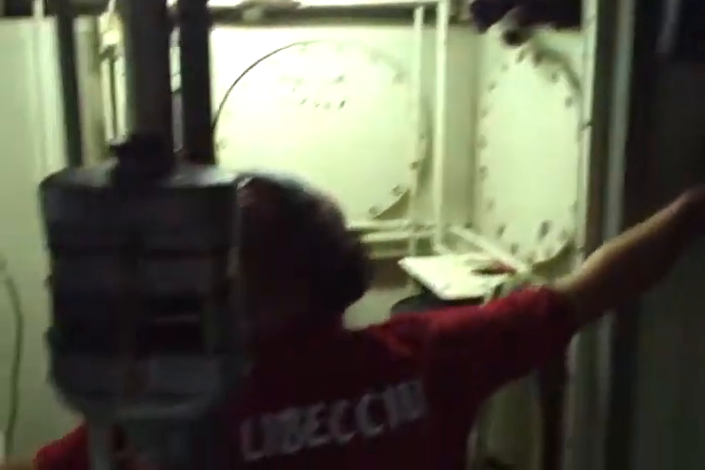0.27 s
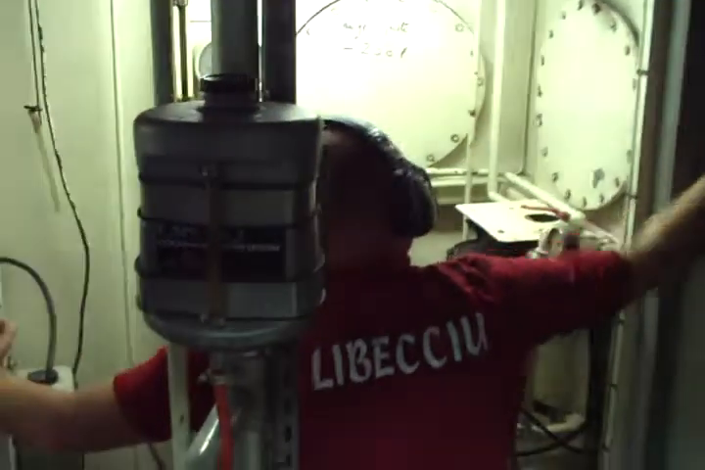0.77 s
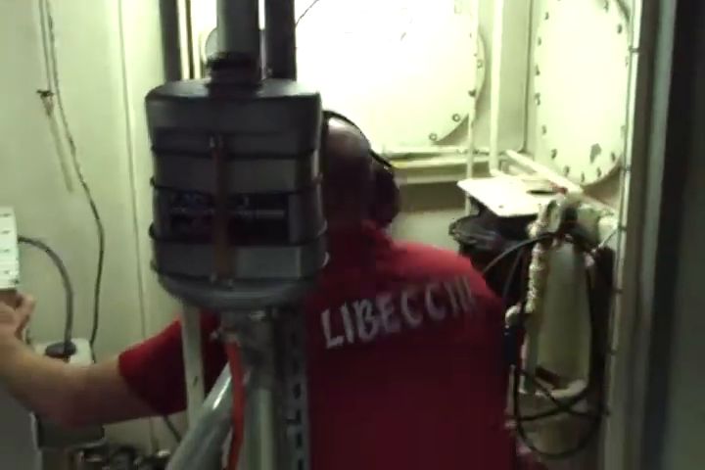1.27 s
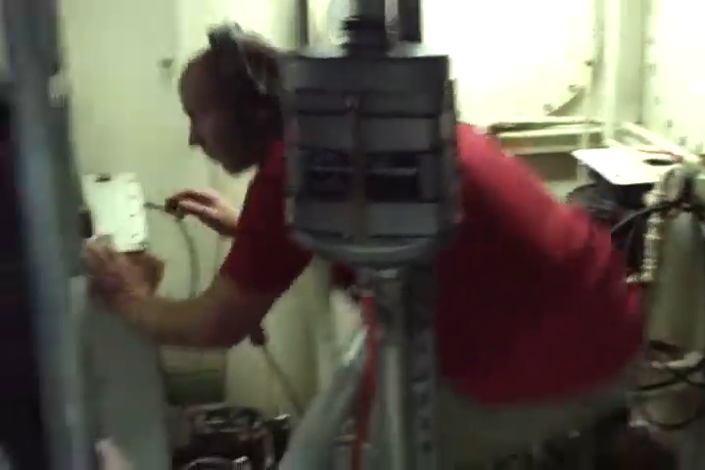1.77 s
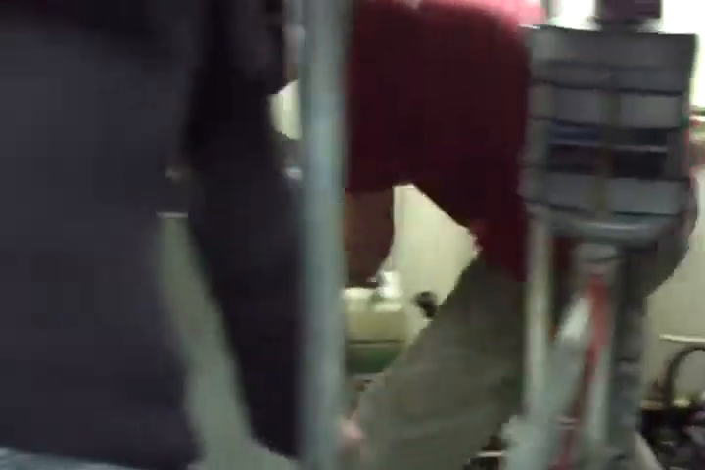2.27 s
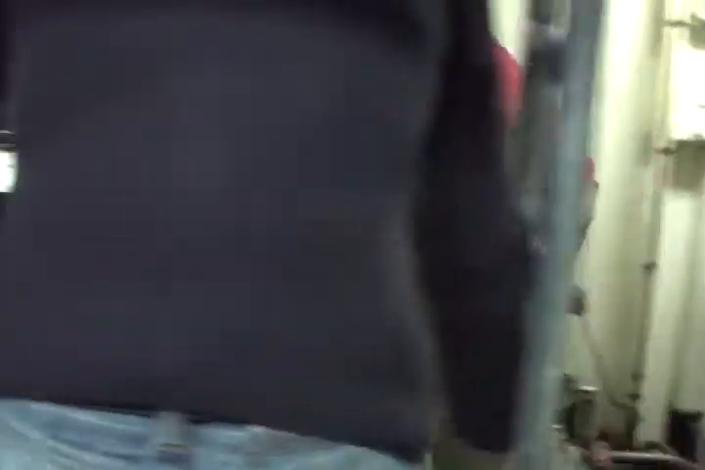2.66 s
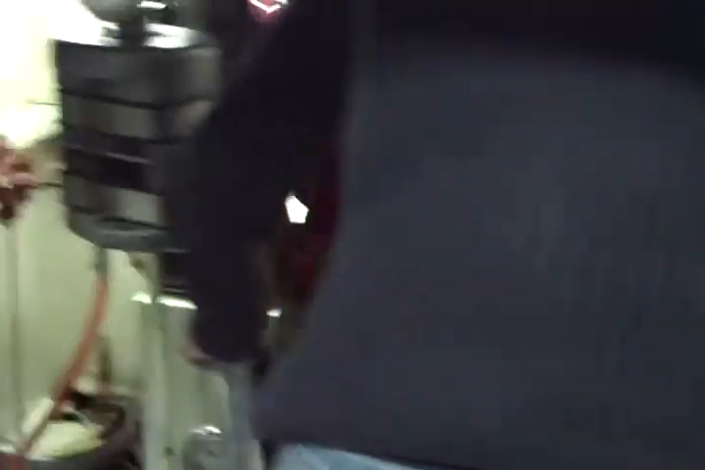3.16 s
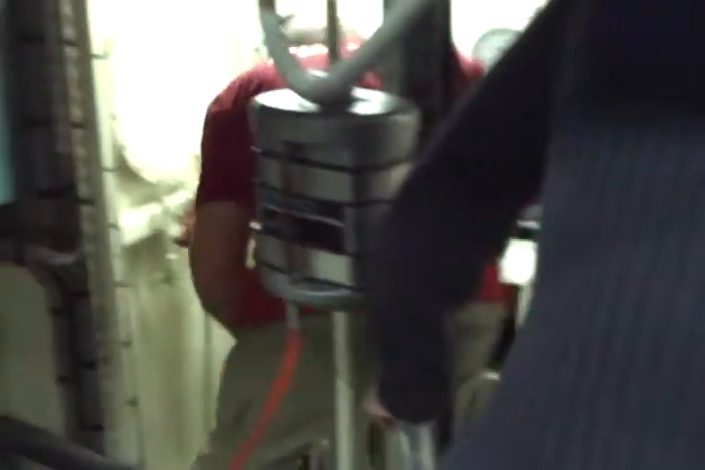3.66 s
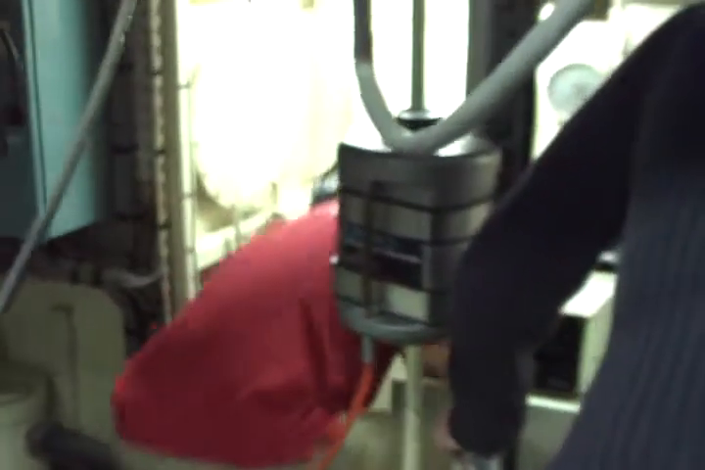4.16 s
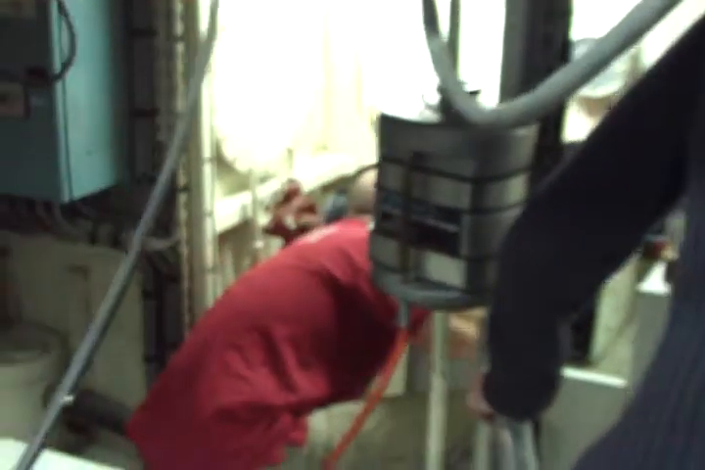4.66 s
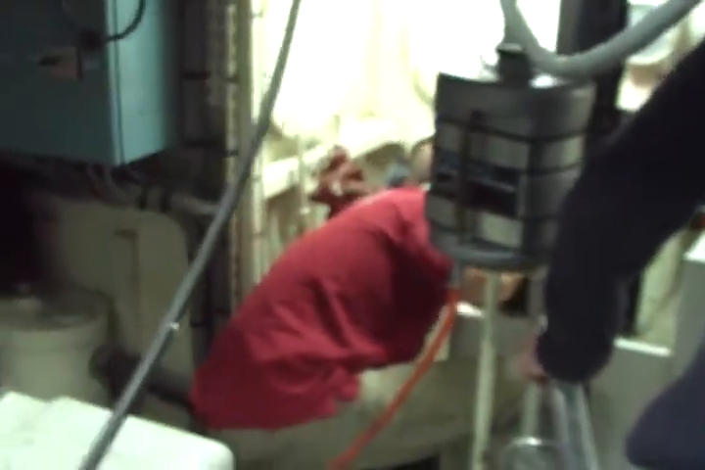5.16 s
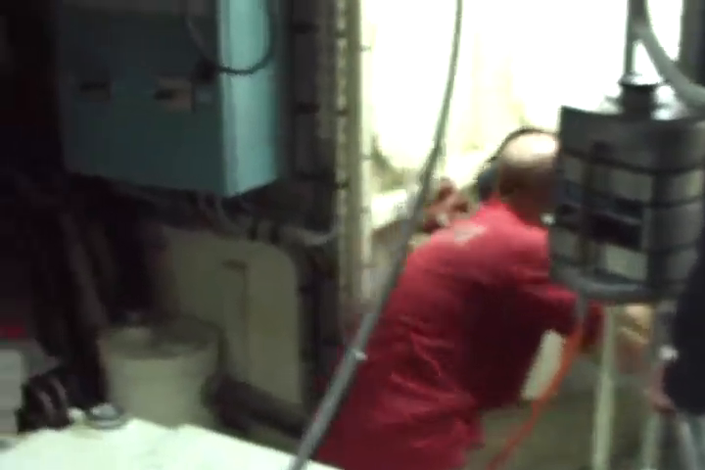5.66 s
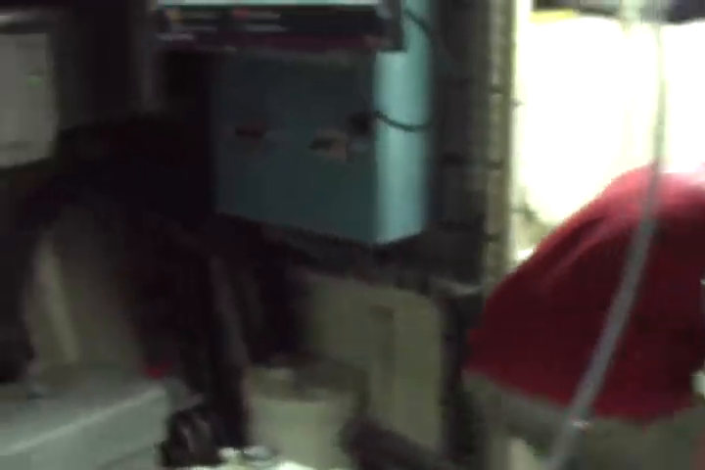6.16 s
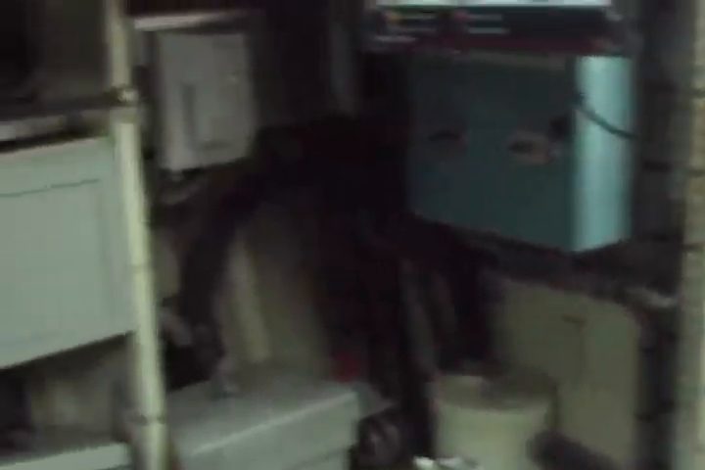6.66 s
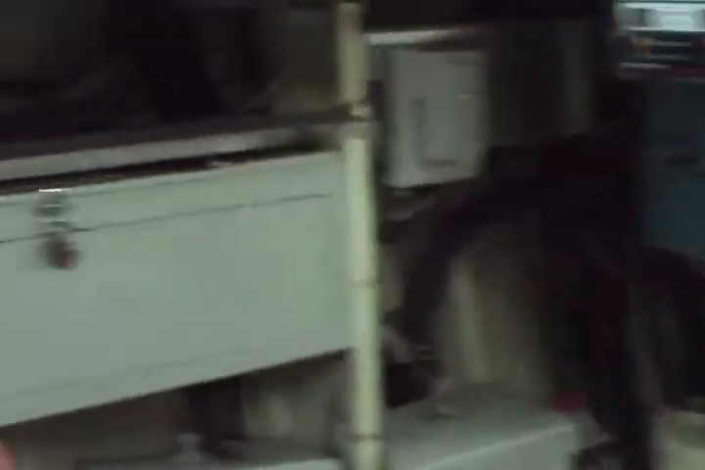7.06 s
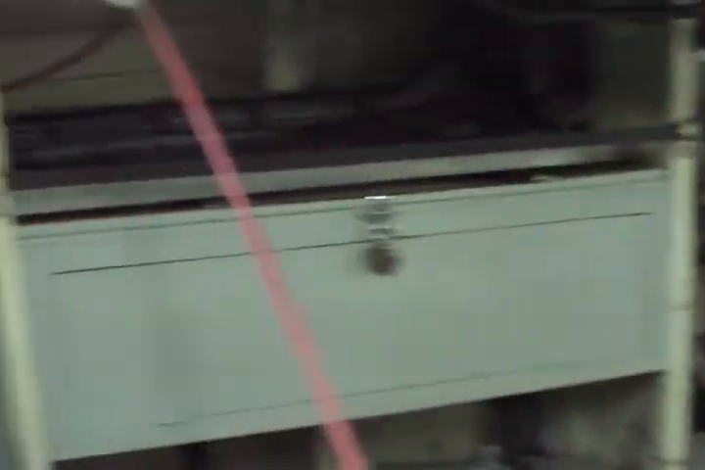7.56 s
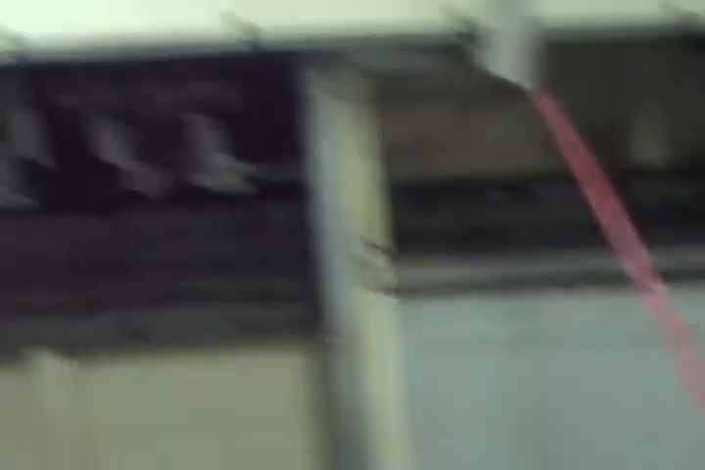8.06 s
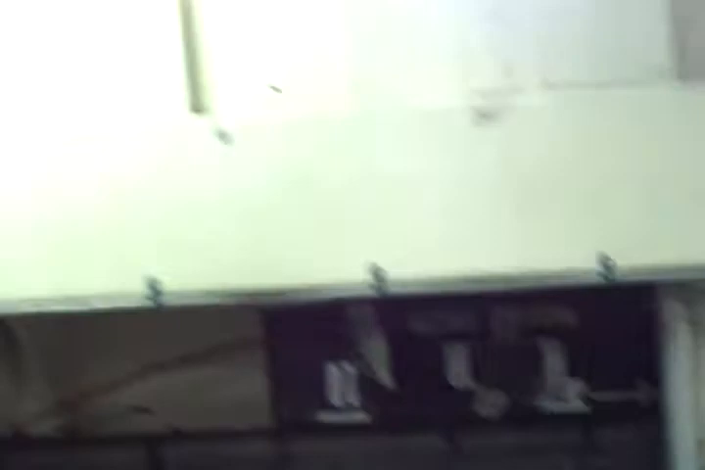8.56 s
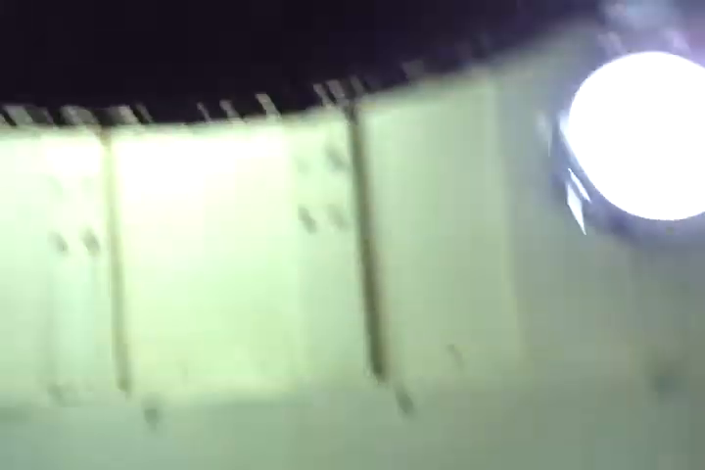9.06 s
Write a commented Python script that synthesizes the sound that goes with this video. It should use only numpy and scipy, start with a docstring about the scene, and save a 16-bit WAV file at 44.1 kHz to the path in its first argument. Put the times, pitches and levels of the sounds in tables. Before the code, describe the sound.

A large marine diesel roars loudly in a steel engine room from the first moment to the end, a little over nine seconds later. It holds a steady speed, making a dense drone of many low and middle notes with a rapid, even knock, fast metallic valve clatter, rushing air and a thin, high turbocharger hiss. The microphone moves through the room, so single notes swell and fade and the tone shifts slightly while the overall loudness stays much the same. A second machine adds a quickly throbbing hum, a little stronger around 3 seconds, near 6 seconds and from 8 seconds on. A deck plate drones low beneath the engine, most noticeably from about 2.5 to 4 seconds. The din overloads the small microphone throughout, giving the roar a rough, gritty rasp with a dull top end.

```python
"""A dense, rasping roar: a big marine diesel runs at steady speed in a steel engine room.
Its cycle repeats each turn, so it radiates harmonics of the crankshaft rate (orders), with a knock,
valve clatter, rushing air and turbocharger hiss. A second machine hums and a deck plate drones.
The listener walks through the room's standing waves, so single notes swell and fade.
The din overloads a small microphone, which squares off the wave and makes it rasp."""
import sys
import numpy as np
from scipy import signal
from scipy.fft import rfft, irfft, next_fast_len
from scipy.io import wavfile

SR = 44100
rng = np.random.default_rng(int(sys.argv[2]) if len(sys.argv) > 2 else 0)


def store_wav(level_fs):
    """Save 16-bit WAV to argv[1]."""
    pcm = np.round(np.clip(np.atleast_2d(level_fs), -1, 1) * 32767)
    wavfile.write(sys.argv[1], SR, pcm.T.astype(np.int16))


N = 411012
T = np.arange(N) / SR
SLOW_T = np.linspace(0, T[-1], num=400)  # coarse times for slowly changing levels and phases

# The listener's walk. Each row: time in seconds, place along the way in metres.
WALK = [(0, -0.5), (.5, 0.5), (1.3, 0.28), (2.2, 0.66), (3, 1.5), (4, 1.48), (5.5, 1.97), (7, 2),
        (8.2, 2.5), (9.32, 3.0)]
# The room's standing waves. Each row: frequency in Hz, half width in Hz, mean gain in dB,
# swing in dB, place of an antinode in metres, antinode spacing in metres.
ROOM_MODES = [(86, 12, 5, 6, 0.13, 2.32), (172, 12, 3, 9, 2.53, 3.52), (258, 12, -2, 5, 2.16, 4.2),
              (280, 12, 3.5, 3, 2.06, 2.9), (344, 12, 5, 4.5, 3.2, 5), (433, 12, 5.5, 3.5, 1.08, 1.31),
              (479, 12, 7, 4.5, 0.25, 1.52), (693, 32, 3, 2.5, .4, .75), (775, 12, 2, 3, 0.51, 5),
              (861, 12, 1.6, 3.5, 0.41, 1.95), (990, 12, 6.5, 6, .44, 1.33),
              (1061.5, 20, 4.5, 4, .32, 1.06), (1130, 25, -2.5, 3, .1, 2.6), (1377, 12, 1.5, 4, 2.4, 2.4),
              (1470, 18, 3.5, 4, .54, .89)]
# The second machine's main tone. Each row: time in seconds, relative level in dB.
HUM_LEVEL = [(0.15, -17.5), (0.55, -25.5), (2.1, -26.5), (2.6, -20.9), (3.5, -19.5), (5.2, -25.5),
             (6.3, -18), (6.9, -23.5), (8.1, -18.0), (9.2, -13.5)]
# Its lesser tones. Each row: frequency in Hz, rms level in dB.
HUM_TONES = [(168.3, -34), (201.9, -33.5), (504.8, -27.5), (616.8, -32), (672.5, -34.5)]
# Noise spectra of the deck plate, turbocharger, intake air, injectors and valves, and of a steady,
# rough grit over the whole roar. Each row: frequency in Hz, relative spectral density in dB.
PLATE_SPECTRUM = [(100, -48.5), (195, -12), (225, 1), (250, 4), (290, -16.5), (500, -50.5)]
TURBO_SPECTRUM = [(3000, -47.5), (4200, -14), (4450, -3), (4600, 3), (4800, -3), (5100, -11), (7000, -32)]
RUSH_SPECTRUM = [(15, -1), (45, -0.5), (70, 1.5), (190, -1), (260, 4), (400, -1.5), (650, -1), (950, -2),
                 (1130, -2), (1250, 2), (1450, -2), (2200, -6.5), (4000, -21), (7000, -34)]
CLATTER_SPECTRUM = [(20, -58), (1300, -46), (1620, 1.5), (1900, 4), (2300, -5.5), (2800, -9), (3600, -11),
                    (4800, -15), (7000, -27.5)]
GRIT_SPECTRUM = [(20, -3.5), (300, -0.5), (1000, 1.5), (2000, -4), (3000, -5), (4600, -5.5), (7000, -25.5)]
# Crankshaft speed. Each row: time in seconds, turns a minute.
CRANK_RPM = [(0.0, 1290.5), (1.5, 1292.3), (2.5, 1291.2), (3.5, 1289.8), (4.3, 1291.2), (5.3, 1291.7),
             (5.9, 1290.3), (7.3, 1292.1), (8.4, 1291.8), (9.32, 1290.8)]
# Spectral envelope of the engine's orders. Each row: frequency in Hz, relative level in dB.
ORDER_SPECTRUM = [(21, -26.5), (43, -20.5), (65, -9.5), (108, -14), (130, -7.5), (150, -14), (212, -18),
                  (240, -6.5), (320, -11), (540, -16), (780, -10), (950, -8.5), (1200, -10.5), (1550, -15)]
# The casing's loudest note at the listener. Each row: time in seconds, relative level in dB.
RING_LEVEL = [(0, 5.5), (0.4, -2.2), (1.5, -8), (2, -0.1), (2.8, -4.5), (3.4, -1.5), (5.2, -1.3),
              (5.8, 2.2), (6.6, -1), (7.9, -5.8), (8.3, 3.3), (8.85, 0.5), (9.2, 5.1)]
# Response of the microphone's electronics. Each row: frequency in Hz, gain in dB.
MIC_RESPONSE = [(5, -3.5), (25, 0), (1000, 0), (3000, 1.5), (4250, -0.5), (4700, -1), (5100, -3.5),
                (5600, -6), (6300, -10.5), (7000, -18), (7400, -28.5)]


def gain_of(db):
    """Amplitude grows tenfold for every 20 dB."""
    return 10 ** (np.asarray(db) / 20)


def unit_rms(x):
    """Normalisation to an rms of 1."""
    return x / np.sqrt(np.mean(x ** 2) + 1e-20)


def curve(rows, t):
    """Linear interpolation between rows of time and value."""
    return np.interp(t, *np.transpose(rows))


def coloured(x, response):
    """Filtering multiplies the spectrum by a response, given as rows of Hz and dB."""
    size = next_fast_len(len(x))
    hz, db = np.transpose(response)
    gain = gain_of(np.interp(np.log(np.fft.rfftfreq(size, 1 / SR) + 1), np.log(hz + 1), db))
    return irfft(rfft(x, size) * gain, size)[:len(x)]


def noise(spectrum, db, surge=1):
    """Filtered white noise takes the filter's spectrum; `surge` modulates its amplitude."""
    return gain_of(db) * unit_rms(coloured(rng.standard_normal(N) * surge, spectrum))


def drift(top_hz):
    """Superposed slow sines of random rate and phase give a fluctuation of rms 1."""
    speed, start = rng.random(size=(2, 12, 1))
    return unit_rms(np.sin(2 * np.pi * (top_hz * speed * SLOW_T + start)).sum(0))


def standing_wave_db(t, swing_db, antinode_m, spacing_m):
    """Interference: the walking listener meets a maximum at each antinode, a minimum halfway between."""
    return swing_db * np.cos(2 * np.pi * (curve(WALK, t) - antinode_m) / spacing_m)


def second_machine(main_hz=336.46, main_gain_db=-0.5, wander_db=2.0, wander_hz=0.7):
    """Beating: the main tone lies about 8 Hz below the engine's 16th order, so their sum throbs."""
    out = gain_of(main_gain_db + curve(HUM_LEVEL, T)) * np.cos(2 * np.pi * (main_hz * T + rng.random()))
    for hz, db in HUM_TONES:
        amplitude = np.interp(T, SLOW_T, gain_of(db + wander_db * drift(wander_hz)))
        out += amplitude * np.cos(2 * np.pi * (hz * T + rng.random()))
    return np.sqrt(2) * out


def deck_plate(hz=223.1, tone_share=0.44, closest_db=-21, place_m=1.28, offset_m=.24):
    """Resonance: a loose plate hums and rumbles about its own note; pressure falls as 1 / distance."""
    tone = np.sqrt(2 * tone_share) * np.cos(2 * np.pi * (hz * T + rng.random()))
    rumble = np.sqrt(1 - tone_share) * noise(PLATE_SPECTRUM, 0)
    nearness = offset_m / np.hypot(offset_m, curve(WALK, T) - place_m)
    return gain_of(closest_db) * nearness * (tone + rumble)


def turbocharger(db=-26):
    """Narrow-band noise: the turbocharger hisses steadily near 4.6 kHz."""
    return noise(TURBO_SPECTRUM, db)


def air_rush(turns, firings=4, depth=0.31, db=-17.5):
    """Amplitude modulation: the noise of intake air and shaken plating surges with each firing."""
    return noise(RUSH_SPECTRUM, db, surge=1 + depth * np.cos(2 * np.pi * firings * turns))


def valve_clatter(turns, ticks=8, decay_ticks=.5, uneven_db=-0.1, noise_share=0.14, reverberant=2.2,
                  morph_hz=0.1697, db=-21.5):
    """Impact excitation: injectors and valves tick, each tick decaying onto a reverberant floor."""
    tick, since_tick = np.divmod(turns * ticks, 1)
    force = gain_of(uneven_db * rng.standard_normal(ticks))[tick.astype(int) % ticks]
    # four ringing patterns, one turn long, fade into one another, so successive turns sound nearly alike
    patterns = rng.standard_normal(size=(4, 2048))
    place = (turns % 1 * patterns.shape[1]).astype(int)
    repeating = unit_rms(sum(pattern[place] * np.cos(np.pi * (2 * morph_hz * T + k / len(patterns)))
                             for k, pattern in enumerate(patterns)))
    metal = np.sqrt(1 - noise_share) * repeating + np.sqrt(noise_share) * rng.standard_normal(N)
    envelope = force * (reverberant + np.exp(-since_tick / decay_ticks))
    return gain_of(db) * unit_rms(coloured(metal * envelope, CLATTER_SPECTRUM))


def knock(turns, order=46, half_width_turns=0.046, mean_peak_db=-14, uneven_db=3.0):
    """Damped resonance: once a turn a blow rings the casing near 1 kHz for a few milliseconds."""
    stroke, place = np.divmod(turns + .5, 1)
    force_db = mean_peak_db + uneven_db * rng.standard_normal(size=256)[stroke.astype(int)]
    heard_db = force_db + standing_wave_db(T, swing_db=5, antinode_m=.44, spacing_m=1.33)
    envelope = np.exp(-((place - .5) / half_width_turns) ** 2)
    return gain_of(heard_db) * envelope * np.cos(2 * np.pi * order * turns)


def radiated_db(order, hz, firings=4, firing_db=4.5, even_db=0.8):
    """Periodic forcing lifts multiples of the firing rate, and the other even orders a little."""
    at_hz, db = np.transpose(ORDER_SPECTRUM)
    lift = firing_db if order % firings == 0 else even_db if order % 2 == 0 else 0
    return np.interp(np.log(hz), np.log(at_hz), db) + lift


def engine_orders(turns, top_order=72, ring_order=44, ring_db=7, wander_db=2.19, wander_hz=1.2,
                  sway_rad=0.5, knock_hz=980, knock_width_hz=100, knock_band_db=-1.15, db=-10):
    """Fourier series: firing repeats each turn, giving harmonics weighted by the room modes near them."""
    out = np.zeros(N)
    for order in range(1, top_order + 1):
        hz = order * turns[-1] / T[-1]
        couplings = [np.exp(-((hz - centre) / width) ** 4) for centre, width, *_ in ROOM_MODES]
        room_db = sum(coupling * (mean_db + standing_wave_db(SLOW_T, *shape))
                      for coupling, (_, _, mean_db, *shape) in zip(couplings, ROOM_MODES))
        # short wavelengths drift more, in level and in phase
        shortness = np.sqrt(hz / 600)
        drift_db = wander_db * shortness * (1 - .5 * sum(couplings)) * drift(wander_hz)
        swell_db = ring_db + curve(RING_LEVEL, SLOW_T) if order == ring_order else drift_db
        # orders near the knock arrive in step with it and share its energy; the room scatters the rest
        in_step = np.exp(-((hz - knock_hz) / knock_width_hz) ** 4)
        level_db = radiated_db(order, hz) + room_db + swell_db + knock_band_db * in_step
        phase = (1 - in_step) * rng.uniform(-np.pi, np.pi) + sway_rad * shortness * drift(wander_hz)
        amplitude = np.interp(T, SLOW_T, gain_of(level_db))
        out += amplitude * np.cos(2 * np.pi * order * turns + np.interp(T, SLOW_T, phase))
    return gain_of(db) * unit_rms(out)


def scene():
    """Superposition: the pressures of all the machinery add at the microphone."""
    turns = np.cumsum(curve(CRANK_RPM, T)) / 60 / SR
    diesel = engine_orders(turns) + knock(turns) + valve_clatter(turns) + air_rush(turns) + turbocharger()
    return (diesel + deck_plate() + second_machine())[None]


def record(dry, drive_db=8.5, ceiling=0.48, grit_db=-20, cutoff_hz=7300):
    """Saturation: the input stage flattens the peaks. Steady grit is added and the treble is cut off."""
    driven = signal.resample_poly(dry[0], 2, 1) * gain_of(drive_db) / ceiling  # oversampled: less aliasing
    squared = ceiling * driven / (1 + driven ** 8) ** (1 / 8)
    gritty = signal.resample_poly(squared, 1, 2) + noise(GRIT_SPECTRUM, grit_db)
    dulled = np.clip(coloured(gritty, MIC_RESPONSE), -.85, .85)
    lowpass = signal.firwin(511, cutoff_hz, window=("kaiser", 9), fs=SR)
    return signal.oaconvolve(dulled, lowpass, "same")[None]


dry = scene()
out = record(dry)
store_wav(out)
```